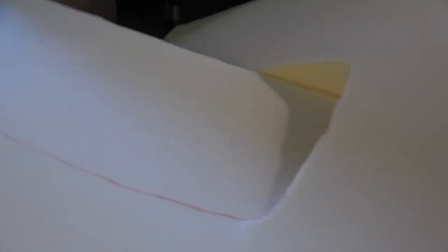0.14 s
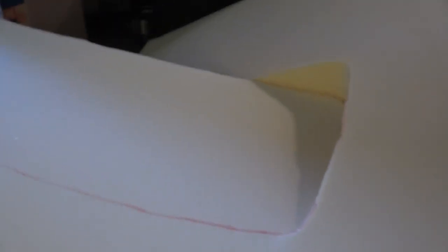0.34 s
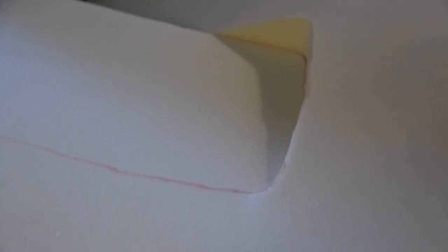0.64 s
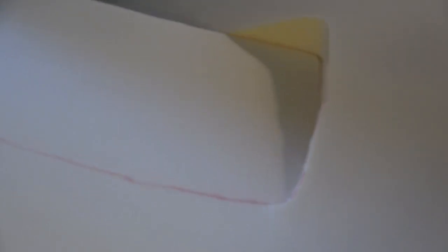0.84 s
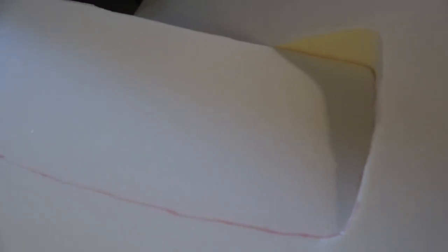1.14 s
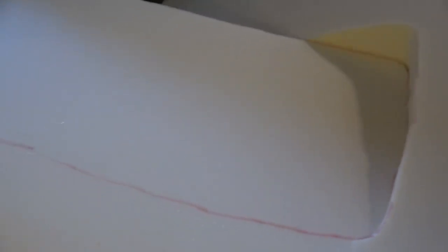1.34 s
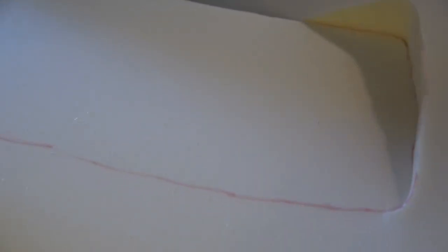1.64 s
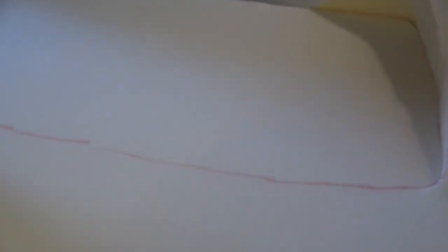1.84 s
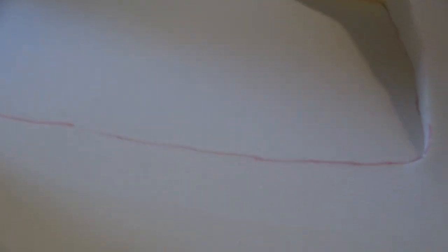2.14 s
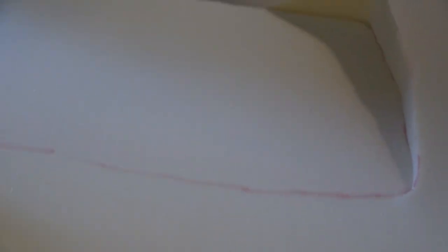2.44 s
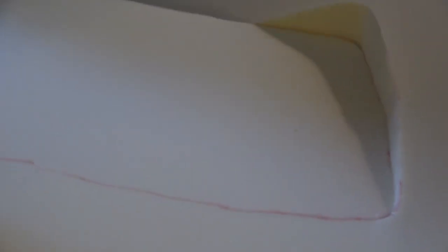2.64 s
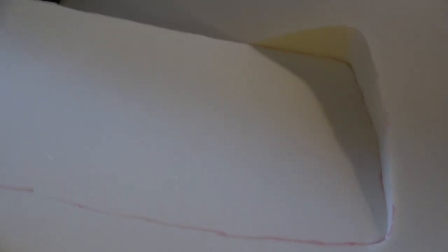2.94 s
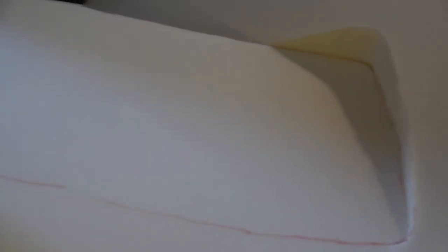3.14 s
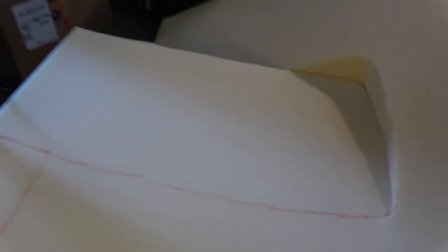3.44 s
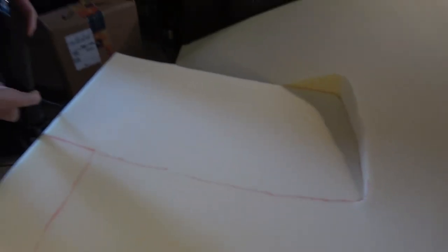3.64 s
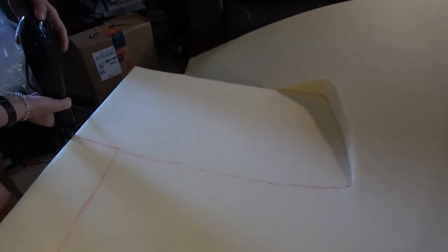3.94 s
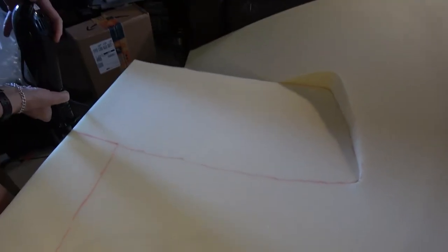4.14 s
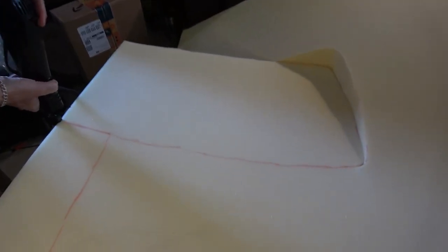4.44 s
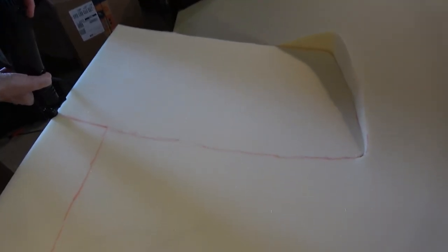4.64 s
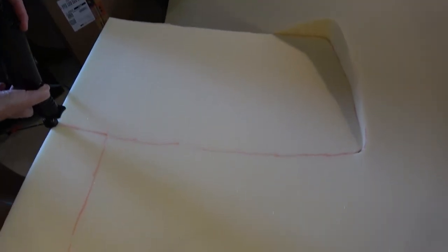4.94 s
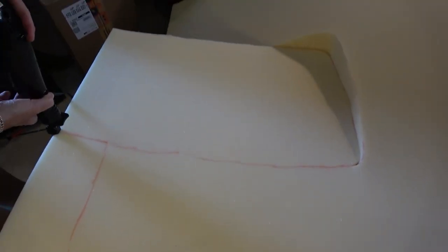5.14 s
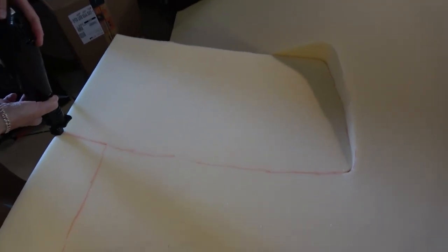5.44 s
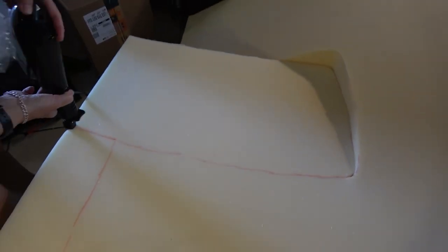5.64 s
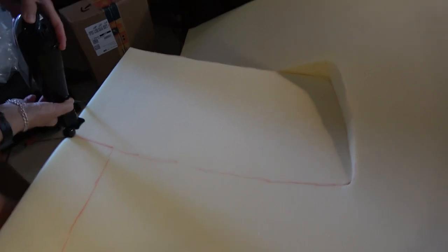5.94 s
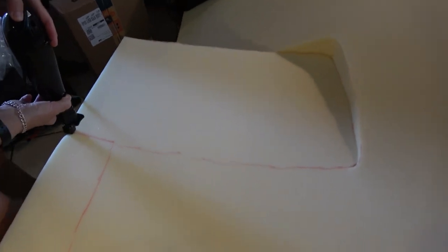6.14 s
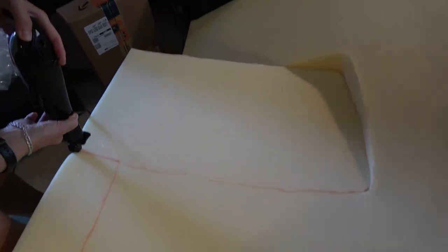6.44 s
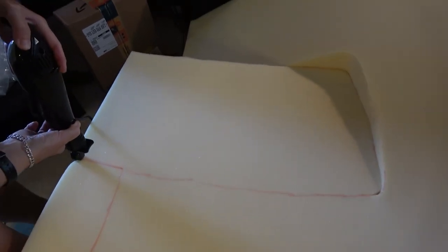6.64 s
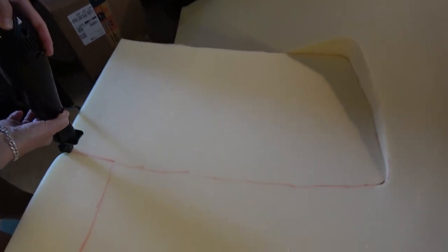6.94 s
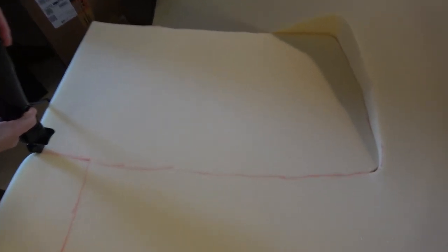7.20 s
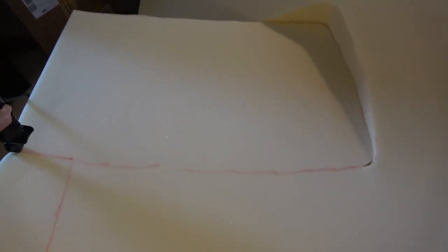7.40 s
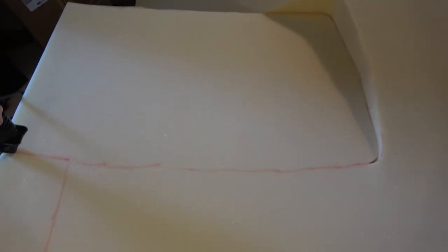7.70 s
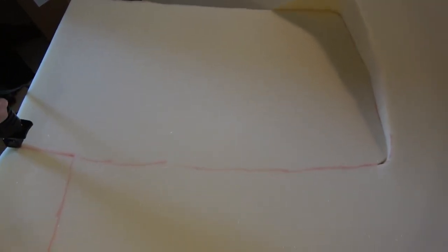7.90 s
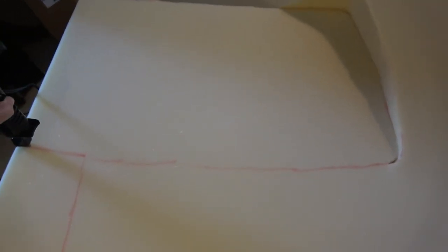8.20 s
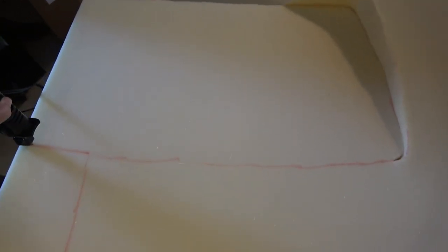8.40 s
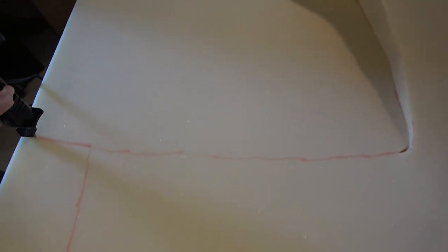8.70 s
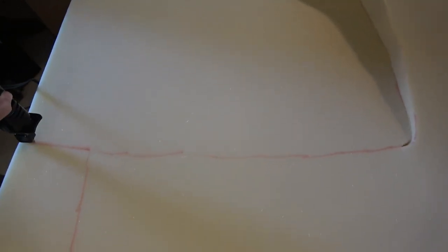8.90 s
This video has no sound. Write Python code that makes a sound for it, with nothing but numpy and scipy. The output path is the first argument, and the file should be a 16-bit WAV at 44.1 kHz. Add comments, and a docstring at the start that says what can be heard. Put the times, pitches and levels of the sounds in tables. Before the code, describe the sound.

A quiet, dry indoor space with low room tone. A hand-held electric knife taps and brushes lightly against a foam mattress, pauses, then its switch snaps and the motor surges up in a fraction of a second. Reciprocating blades chatter about thirty times a second, with hum, whine, gear rattle and bright steel squeaks. The sawing continues to the end, heard close and left of centre.

```python
"""In a small, dead room an electric carving knife is set against a foam mattress with a few clicks and
rustles, then spins up and saws on. One crank angle, some 30 to 36 strokes a second once up to speed, drives
every part: the handle hums at its multiples, the motor whines, gear contacts ring a housing as growl and rattle.
At fixed places of each stroke the blades knock, squeak and rasp by stick-slip, over a gritty sliding hiss."""
import sys
import numpy as np
from scipy import signal
from scipy.fft import rfft, irfft, next_fast_len
from scipy.io import wavfile
from scipy.ndimage import uniform_filter1d, map_coordinates

SR = 44100
rng = np.random.default_rng(int(sys.argv[2]) if len(sys.argv) > 2 else 0)


def bounce(signal):
    """Save signal as a 16-bit WAV file at the path given by the first command-line argument."""
    frames = np.transpose(np.atleast_2d(signal))
    limited = np.clip(frames, -1, 1)
    pcm = np.round(limited * 32767).astype(np.int16)
    wavfile.write(sys.argv[1], SR, pcm)


N = 399546
TIME = np.arange(N) / SR

# relative spectrum of a light, hard contact: frequency_hz, density_db (per Hz)
CONTACT_SPECTRUM = [(80, 6), (500, 6.5), (2000, -0.5), (4000, -1), (7000, 2), (10500, 2.5), (13500, -6),
                    (16000, -14)]


def amp(db):
    """Level law: decibels to amplitude gain."""
    return np.exp(np.asarray(db) * (np.log(10) / 20))


def unit(x):
    """Normalisation to an rms of 1."""
    return x / np.sqrt(np.mean(x ** 2) + 1e-20)


def along(points, hz):
    """Linear interpolation of (frequency_hz, value) points on a log frequency axis."""
    f, v = np.transpose(points)
    return np.interp(np.log(hz + 1), np.log(f + 1), v)


def curve(points):
    """Linear interpolation of (time_s, value) points, one value per sample."""
    s, v = np.transpose(points)
    return np.interp(TIME, s, v)


def bell(x, centre, width):
    """Gaussian hump of height 1, down to 1/e at one width from its centre."""
    return np.exp(-((x - centre) / width) ** 2)


def wobble(rate, size=N):
    """Band-limited random curve: a spline through normal random knots, rate of them a second."""
    knots = rng.standard_normal(int(size * rate / SR) + 4)
    t = TIME[:size]
    coarse = t[::12]
    return np.interp(t, coarse, map_coordinates(knots, [coarse * rate]))


def noise():
    """White noise: equal power at every frequency."""
    return rng.standard_normal(N)


def filtered(x, response):
    """Linear filtering: the spectrum of x times a response of frequency."""
    m = next_fast_len(x.shape[-1] + 8192)
    return irfft(rfft(x, m) * response(np.fft.rfftfreq(m, 1 / SR)), m)[..., :x.shape[-1]]


def coloured(x, spectrum):
    """Spectral shaping by (frequency_hz, db) points, brought to rms 1."""
    return unit(filtered(x, lambda hz: amp(along(spectrum, hz))))


def resonant(x, modes):
    """Modal superposition: x rung through (mode_hz, width_hz, gain_db) resonances, at rms 1."""
    def response(f):
        return sum(amp(db) * 1j * f * width / (hz * hz - f * f + 1j * f * width) for hz, width, db in modes)

    return unit(filtered(x, response))


def window(turns, place, length):
    """Periodic gating by crank angle: a bell that opens once per stroke, down to 1/e at twice the length."""
    return np.exp(-((turns - place - np.rint(turns - place)) / length) ** 2 / 4)


def unseated():
    """Play in the drive: 1 until the blades seat, then 0."""
    seated_s = 3.3
    return np.clip((seated_s - TIME) / 0.068 + 0.5, 0, 1)


def level(rule, spin, bite):
    """Load dependence: a part's gain follows the spin-up, the bite and the closing of slack."""
    db, full_bite_db, slack_db, spin_power = rule
    snug_bite = 0.15  # bite over which the slack between the blades closes by a factor e
    return amp(db + full_bite_db * bite + slack_db * np.exp(-bite / snug_bite)) * spin ** spin_power


def background():
    """Diffuse room tone: steady coloured noise, mostly common to both sides and partly independent."""
    # spectrum of the quiet room: frequency_hz, density_db (per Hz, relative)
    floor_spectrum = [(15, -45), (25, -24), (96, -2), (178, -15.5), (215, -8), (274, -11.5), (457, -12.5),
                      (495, -17), (782, -11.5), (1200, -21.5), (1340, -22), (4000, -29.5), (15500, -41)]
    common = amp(-59.5) * coloured(noise(), floor_spectrum)
    separate = amp(-71.5) * coloured(rng.standard_normal((2, N)), floor_spectrum)
    return common + separate


def handling(tick_s, thud_s, tail_s):
    """Impact excitation: short contact forces on the handle give dull knocks, plastic clicks and rings; one
    brief ring near 2.3 kHz sounds as the motor spins up."""
    # contacts as the knife is handled, plus a brief ring near 2.3 kHz at 2.226 s as the motor spins up:
    # start_s, knock_db, tick_db, ring_db, ring_hz
    clicks = [(.092, -57, -47.5, -56, 3160), (.148, -47, -58, -56, 3000), (.169, -47, -40, -37, 7700),
              (.197, -53, -32.5, -36, 2140), (.283, -39, -49, -50, 2970), (.293, -43, -43, -28.5, 3050),
              (.304, -45, -52, -46.5, 3000), (.363, -50, -62, -58, 3000), (.475, -41.5, -51, -46, 8290),
              (.542, -57, -40, -44, 6900), (.563, -42, -38, -45, 3360), (.576, -35, -48, -51, 3760),
              (0.601, -28, -52, -46, 3120), (.62, -51, -45, -41, 4700), (0.688, -44, -49, -41, 2190),
              (2.162, -59, -42, -54, 2300), (2.226, -48, -44, -22, 2340), (2.265, -55, -31, -27, 6200)]
    # relative spectrum of a dull knock: frequency_hz, density_db (per Hz)
    thud_spectrum = [(80, -33), (300, -2), (750, 14), (1150, 1), (1800, -6), (3000, -35), (8000, -45)]
    thuds, ticks, rings = np.zeros((3, N))
    for s, knock_db, tick_db, ring_db, ring_hz in clicks:
        near = (TIME > s) & (TIME < s + 0.1)
        age = TIME[near] - s

        def strike(rise):
            """Contact force that builds to its peak, lets go and leaves a faint tail."""
            pulse = (age / rise) ** 4 * np.exp(4 * (1 - age / rise))
            return pulse + 0.18 * (age > rise) * np.exp(-age / tail_s)

        snap = strike(tick_s)
        thuds[near] += amp(knock_db) * strike(thud_s)
        ticks[near] += amp(tick_db) * snap
        rough_phase = 1.24 * wobble(1800)[near]
        rings[near] += amp(ring_db) * snap * np.sin(2 * np.pi * ring_hz * age + rough_phase)
    return thuds * coloured(noise(), thud_spectrum) + ticks * coloured(noise(), CONTACT_SPECTRUM) + rings


def brushing():
    """Friction excitation: each touch of the idle blade hisses, rings the steel and rustles the foam."""
    # steel brushes over the foam: start_s, rise_s, decay_s, hiss_db, blade_ring_db, foam_rustle_db
    brushes = [(.167, .005, .014, -43, -53, -60), (.195, .014, 0.028, -49.5, -56, -65),
               (.29, .02, 0.11, -62, -66, -70), (.435, .041, 0.048, -45.5, -54, -66),
               (.74, 0.036, 0.098, -59, -51.5, -61), (.92, 0.055, 0.082, -76, -68, -63),
               (1.22, .035, .035, -68, -70, -61), (1.28, 0.037, .045, -80, -84, -58),
               (1.745, .03, .07, -76, -63, -76), (1.855, .018, 0.064, -70, -64, -59),
               (1.96, 0.056, 0.1, -71, -64, -65)]
    # bending modes of the free blade: mode_hz, width_hz, gain_db
    blade_modes = [(6100, 400, 4), (7800, 700, -1), (9600, 450, -3), (11900, 400, -2), (14300, 600, -7)]
    # relative spectrum of the rustling foam: frequency_hz, density_db (per Hz)
    foam_spectrum = [(600, -20), (2000, -7), (3100, 1), (4300, -7), (6000, -6), (8000, -16), (16000, -35)]
    hiss = coloured(noise(), CONTACT_SPECTRUM)
    voices = np.array([hiss, resonant(noise(), blade_modes), coloured(noise(), foam_spectrum)])
    out = np.zeros(N)
    for s, rise, decay, *levels_db in brushes:
        attack = np.clip((TIME - s) / rise, 0, 1) ** 2
        touch = attack * np.exp(-np.maximum(TIME - s - rise, 0) / decay)
        out += touch * (amp(levels_db) @ voices)
    return out * amp(0.98 * wobble(120))


def bumping():
    """Soft impact: the handle bumps the yielding mattress, giving smooth bursts of low noise."""
    # bumps: centre_s, bell_width_s, level_db
    bumps = [(.175, .02, -54), (.39, .025, -56), (2.604, .025, -40)]
    # relative spectrum of a bump: frequency_hz, density_db (per Hz)
    bump_spectrum = [(40, -23.5), (130, -3), (240, -6), (330, -9), (700, -40)]
    force = sum(amp(db) * bell(TIME, s, width) for s, width, db in bumps)
    return force * coloured(noise(), bump_spectrum)


def handle(turns, spin, bite, waver_db):
    """Forced vibration: the blades' periodic motion shakes the handle at multiples of the stroke rate."""
    # one row per multiple from the first up: unseated_db, running_free_db, biting_db
    hum_levels = [(-63, -65, -59), (-53, -54.5, -51.5), (-57, -45, -58.5), (-51, -54, -60.5),
                  (-46.5, -50.5, -39), (-50, -64, -51), (-58, -65, -67), (-65, -68, -49), (-65, -58, -57),
                  (-51.5, -51.5, -51), (-50, -60, -46.5), (-58, -55, -58), (-68, -60, -45.5),
                  (-63, -52, -48), (-50.5, -51.5, -46.5), (-60, -54.5, -43.5)]
    # the handle rocks as the grip shifts: centre_s, bell_width_s, multiple, gain_db
    rocking = [(3.7, 0.35, 10, 9), (4.5, 0.73, 4, 14), (4.45, 0.63, 2, 7), (4.42, 0.2, 5, -6.5),
               (4.8, 0.3, 7, 17), (4.9, 0.84, 6, 12.5), (6.6, 0.48, 13, -15), (5.8, 0.54, 14, -14),
               (6.1, 0.45, 5, 2.5), (4, 0.19, 5, 6.5), (8.25, 0.32, 3, 12), (8.25, 0.29, 4, 10),
               (8.847, 0.23, 5, -6), (9, .2, 3, 7), (4.83, 0.21, 10, 4), (7.2, .25, 5, 2),
               (3.1, 0.19, 5, 2.5)]
    hum = np.zeros(N)
    loose = unseated()
    for order, (loose_db, free_db, biting_db) in enumerate(hum_levels, 1):
        # the foam braces the handle, and higher multiples need a deeper bite
        full_bite = 0.43 + 0.039 * order
        braced = np.minimum(bite / full_bite, 1)
        seated_db = free_db + braced * (biting_db - free_db)
        db = loose * loose_db + (1 - loose) * seated_db + waver_db * wobble(6.5)
        for s, width, multiple, gain_db in rocking:
            if multiple == order:
                db += gain_db * bell(TIME, s, width)
        phase = 2 * np.pi * (order * turns + rng.random()) + 0.26 * wobble(25)
        hum += amp(db) * np.sin(phase)
    return np.sqrt(2) * spin ** 3.5 * hum


def swell(hz, mode):
    """Resonant gain: the dB that a line gains as it crosses a mode."""
    mode_hz, half_width_hz, peak_db = mode
    return peak_db / (1 + ((hz - mode_hz) / half_width_hz) ** 2)


def motor(turns, speed, spin, flutter_db):
    """Electromagnetic excitation: armature lines follow the speed, with mains sidebands and a starting surge."""
    # motor whine: multiple (of the stroke rate), level_db (relative), phase_roughness_rad
    whine_lines = [(155, -14, 6.8), (248, -17, 4.6), (320, -17, 2.8)]
    # whine level, which sinks under heavy load: time_s, level_db
    whine_level = [(2.6, -36), (3.3, -34), (3.8, -33), (4.4, -33.3), (5.1, -33), (5.7, -39), (6.6, -44),
                   (8.1, -43), (8.3, -35), (8.55, -33), (8.75, -39), (9.06, -42)]
    # casing resonance: mode_hz, half_width_hz, peak_db
    casing_mode = (2230, 250, 11.3)
    # brush sparking while the motor accelerates: multiple (of the stroke rate), level_db, phase_roughness_rad
    commutator = (153.5, -40, 4.2)
    slot_order, slot_rough_rad, mains_ripple_hz = 80, 0.46, 120
    below_db, slot_db, above_db = -14.5, -6.5, -9  # lower sideband, slot tone, upper sideband

    def line(order, db, rough, offset_hz=0):
        """Phase-modulated partial, lifted where it crosses the casing resonance."""
        phase = 2 * np.pi * (order * turns + offset_hz * TIME) + rough * wobble(160) + wobble(8)
        return np.sqrt(2) * amp(db + swell(order * speed + offset_hz, casing_mode)) * np.sin(phase)

    slots = sum(line(slot_order, db, slot_rough_rad, side * mains_ripple_hz)
                for side, db in [(-1, below_db), (0, slot_db), (1, above_db)])
    whine = amp(wobble(9)) * slots + sum(line(*row) for row in whine_lines)
    # the starting current falls as the speed rises
    current = 1 - spin
    surge = current * spin ** 5.8
    sparking = current * spin ** 4.2
    strength = amp(curve(whine_level)) * spin ** 7.5 + amp(-29) * (surge / surge.max()) ** 2
    sparks = sparking / sparking.max() * amp(4 * wobble(70)) * line(*commutator)
    return amp(flutter_db * wobble(140)) * (strength * whine + sparks)


def teeth(turns, wear_rate, size=384):
    """Cyclic roughness: the gear's uneven surface nearly repeats each turn and changes slowly."""
    surface = rng.standard_normal((int(N / SR * wear_rate) + 3, size))
    position = [TIME * wear_rate, turns % 1 * size]
    return unit(map_coordinates(surface, position, order=2, mode="grid-wrap"))


def knocks(turns, speed, glide_s, scatter_db):
    """Dispersion: in thin steel the high bending waves arrive first, so each knock falls in pitch."""
    # blade knocks in each stroke: place (0-1), first_hz, last_hz, decay_60db_s, level_db (relative)
    knock_places = [(0.061, 2260, 1400, 0.0058, 4.5), (.36, 2660, 1830, 0.0061, 4.5),
                    (.59, 3700, 1100, .008, 5), (0.649, 1400, 440, 0.0091, -7.5)]
    out = np.zeros(N)
    for place, first_hz, last_hz, decay_s, db in knock_places:
        age = (turns - place) % 1 / speed
        cycles = last_hz * age + (first_hz - last_hz) * glide_s * (1 - np.exp(-age / glide_s))
        gain = amp(db + scatter_db * wobble(30) - 60 * age / decay_s)
        attack = 1 - np.exp(-age / 0.0016)
        out += gain * attack * np.sin(2 * np.pi * cycles)
    return unit(out)


def buzz(turns, size=2048):
    """Periodic forcing: a tooth force that repeats exactly on every turn rings the housing's modes."""
    # modes of the pressed gear housing: mode_hz, width_hz, gain_db
    housing_modes = [(1178, 26, 3), (1462, 33, 1), (1720, 80, -7), (1830, 25, -1), (2280, 30, -3),
                     (2480, 28, -8)]
    # equal harmonics in random phase
    profile = irfft(np.exp(2j * np.pi * rng.random(size // 16)), size)
    force = np.interp(turns % 1, np.arange(size) / size, profile)
    return resonant(force, housing_modes)


def gear_tones(turns):
    """Order tones: single multiples of the stroke rate swell out of the gears and fade."""
    # tones: centre_s, bell_width_s, multiple, level_db
    tones = [(5.05, 0.55, 24, -38.5), (5.8, 0.51, 30, -47), (6.15, 0.56, 39, -37.5), (7.3, 0.87, 39, -41.5),
             (7.05, 0.53, 55, -37.5), (7.05, 0.58, 57, -36.5), (7.4, .6, 42, -41), (8.85, 0.22, 39, -40)]
    out = np.zeros(N)
    for s, width, multiple, db in tones:
        phase = 2 * np.pi * multiple * turns + 0.3 * wobble(20)
        out += amp(db) * bell(TIME, s, width) * np.sin(phase)
    return np.sqrt(2) * out


def gears(turns, speed, spin, bite):
    """Contact excitation: free gears chatter at random, while firmer meshing repeats on every turn."""
    # how firmly the gears mesh: time_s, repeating_share (0-1)
    meshing = [(2.2, 0.26), (4.2, 0.34), (4.75, 0.52), (5, 0.52), (6.7, 0.8), (7.65, 0.45), (7.8, 0.3),
               (8.05, .75), (8.2, 0.32), (8.65, 0.32), (8.85, 0.57)]
    # relative spectra at three loads: frequency_hz, density_db (per Hz)
    growl_free = [(20, -60), (90, -10), (200, -15), (400, -12), (480, -8), (720, 2.5), (1000, 0),
                  (1250, -1), (1700, -16), (3000, -60)]
    growl_half = [(20, -60), (90, -18), (380, -17), (480, -3.5), (640, 0), (780, -1.5), (930, -1.5),
                  (1200, -0.5), (1500, -13.5), (3000, -60)]
    growl_full = [(20, -60), (90, -22), (360, -15), (430, -8.5), (530, -3), (630, 1), (760, -10.5),
                  (950, -10), (1700, -12), (3000, -60)]
    rattle_free = [(500, -34), (950, -35), (1180, -11), (1550, -2), (1950, -1), (2400, 0), (2800, -5),
                   (3400, -2.5), (4200, -2), (5500, -40), (9000, -50)]
    rattle_half = [(500, -47), (950, -22), (1180, -9), (1400, -3), (1600, -6.5), (1950, -1), (2400, 1),
                   (2800, 0), (3400, -4), (4200, -2.5), (5500, -6), (9000, -50)]
    rattle_full = [(500, -66), (1040, -16), (1180, 3.5), (1340, -5), (1470, 1), (1570, -6), (1700, -4),
                   (1950, -3), (2250, -2), (2800, -4.5), (3400, -3.5), (4200, -13), (5500, -23),
                   (9000, -50)]
    # gain rules: level_db, full_bite_db, slack_db, spin_power
    growl_rule = (-27.5, -9, -5.5, 1.8)
    rattle_rule = (-29.5, 0.14, -0.9, 1.85)
    knock_rule = (-45, 13, -2, 7)
    buzz_rule = (-57, 22.5, 0, 2)
    locked = curve(meshing)
    push = 1 + bite * (window(turns, 0.6, 0.055) + window(turns, 0.091, 0.033))
    half_bite = 0.75  # bite that counts as half load
    free = np.clip(1 - bite / half_bite, 0, 1)
    full = np.clip((bite - half_bite) / (1 - half_bite), 0, 1)
    load_weights = (free, 1 - free - full, full)

    def mesh(share, spectra):
        """Source and filter: tooth contacts ring the housing, whose resonances shift with load."""
        contacts = np.sqrt(share) * teeth(turns, wear_rate=1.296) + 2 * np.sqrt(1 - share) * noise()
        rung = sum(weight * coloured(contacts, spectrum) for weight, spectrum in zip(load_weights, spectra))
        return amp(0.91 * wobble(5)) * push * unit(rung)

    growl = level(growl_rule, spin, bite) * mesh(locked, (growl_free, growl_half, growl_full))
    # the rattle repeats less than the growl, and is 2 dB louder until the blades seat
    rattle = mesh(0.8 * locked, (rattle_free, rattle_half, rattle_full))
    rattle *= level(rattle_rule, spin, bite) * amp(2 * unseated())
    knocking = level(knock_rule, spin, bite) * knocks(turns, speed, glide_s=0.001754, scatter_db=2.5)
    buzzing = locked * level(buzz_rule, spin, bite) * buzz(turns)
    return growl + rattle + knocking + buzzing + gear_tones(turns)


def squeak(ring_hz, jump_hz):
    """Stick-slip oscillation: an uneven tone with its octave, its pitch jumping among nearby steel modes."""
    size = len(ring_hz)
    phase = 2 * np.pi * np.cumsum(ring_hz + jump_hz * 0.42 * wobble(1900, size)) / SR
    return np.sqrt(2) * (np.sin(phase) + amp(-12) * np.sin(2 * phase))


def blades(turns, spin, bite, fade_s, scatter_db):
    """Dry friction: sliding blades hiss, and tight spots that come and go as they bend squeak and rasp."""
    # tight spots: start_s, end_s, place (0-1 of a stroke), length (bell scale, strokes),
    # ring_hz, pitch_spread_hz (scale), rise_hz (per length), level_db (relative)
    scrapes = [(2.34, 2.52, .27, .11, 4270, 600, 34, 10), (2.1, 3.323, 0.31, .025, 6210, 1194, 150, 11.5),
               (2.47, 3.294, 0.29, 0.028, 5070, 500, 52.5, 12),
               (2.54, 3.32, .34, .02, 7700, 1100, 100.5, 6), (2.55, 3.3, .16, 0.042, 5000, 380, 52, 8.5),
               (2.68, 2.805, 0.7, .035, 4830, 400, 50, 15), (2.75, 3.28, 0.75, 0.038, 5620, 800, 98, 7),
               (3.45, 3.72, .4, 0.045, 5800, 1100, 46, 9.5),
               (3.83, 3.97, 0.28, 0.034, 6020, 700, 100, 12.5), (3.95, 4.8, 0.74, 0.069, 4570, 710, 30, 7),
               (4.15, 4.955, 0.32, 0.034, 6100, 843, 52, 7.5),
               (4.25, 5.95, 0.16, 0.048, 4830, 693, 100, 7.5), (4.4, 4.868, 0.81, .04, 6070, 800, 50, 9),
               (4.45, 5.6, 0.31, .03, 4920, 600, 48, 8), (4.9, 5.549, 0.3, 0.033, 7350, 700, 150, 10),
               (4.85, 6, 0.74, .034, 5140, 400, 50, 12.5), (4.95, 5.57, 0.62, 0.023, 4800, 500, 48, 13),
               (5.57, 6.02, 0.59, .027, 4936, 446, 2, 18), (5.55, 6.07, .53, .014, 7000, 602, 50, 10.5),
               (5.8, 8.21, 0.34, 0.023, 7500, 540, 94, 11), (6, 6.71, .75, .022, 5900, 910, 100, 8),
               (6.02, 8.2, 0.67, 0.028, 5130, 599, 27, 7.5), (6.07, 6.598, 0.56, 0.022, 6970, 450, -3, 15),
               (6.6, 7.65, .55, 0.028, 7300, 550, 2, 8.5), (6.72, 7.552, 0.68, 0.028, 5450, 496, 5, 3.5),
               (6.72, 7.6, 0.8, 0.026, 6930, 660, 83, 13.5), (7.6, 8.143, 0.73, 0.022, 5080, 906, 0, 6),
               (7.6, 8.136, 0.77, 0.02, 6600, 650, 100, 13.5),
               (8.23, 9.2, 0.33, 0.034, 7170, 520, 200, 13.5),
               (8.27, 8.724, 0.79, 0.021, 6200, 600, 250, 13), (8.27, 8.7, 0.69, .03, 5370, 398, 28, 10.5),
               (8.27, 8.72, 0.19, .06, 5280, 400, 30, 3), (8.65, 9.2, .55, .025, 7200, 490, 50, 8),
               (8.7, 9.2, 0.71, 0.047, 5310, 836, 301, 11)]
    # relative spectra: frequency_hz, density_db (per Hz)
    steel_spectrum = [(2500, -14), (4000, -5.5), (4700, 8), (5300, 3.5), (6000, 4.5), (7300, 4),
                      (8200, -13), (10000, -28)]
    hiss_spectrum = [(5000, -16), (8000, 2.5), (9700, 2), (11000, -2), (12500, -5), (14200, -11),
                     (15300, -7.5), (16000, -13)]
    rasp_spectrum = [(1200, -22), (2400, -5.5), (3600, -7), (4800, 3), (6500, 0), (8000, -9),
                     (10500, -10.5), (14000, -23)]
    # the steel rings on between squeaks: mode_hz, width_hz, gain_db
    steel_modes = [(4800, 200, 0), (5150, 230, -1)]
    # relative level of that ring: time_s, level_db
    ringing_level = [(2.4, -14), (2.7, -2), (3.25, -3), (3.4, -18), (4.3, -7), (5, -2), (6.05, -1),
                     (6.7, -7), (9.06, -8)]
    # gain rules: level_db, full_bite_db, slack_db, spin_power
    scrape_rule = (-22, 0, -13.5, 1.5)
    hiss_rule = (-32, -1, -11, 1)
    stroke_scatter_db, place_scatter = 1.5, 0.008  # no two strokes rub alike: dB, strokes
    squeaks, friction = np.zeros((2, N))
    for start, end, place, length, ring_hz, spread_hz, rise_hz, db in scrapes:
        near = (TIME > start - fade_s) & (TIME < end + fade_s)
        t, turn = TIME[near], turns[near]
        size = len(t)
        touch = np.clip(np.minimum(t - start, end - t) / fade_s + 0.5, 0, 1)
        offset = turn - place - np.rint(turn - place)
        glide = rise_hz * np.clip(offset / length, -2, 2)
        scatter = scatter_db * wobble(500, size) + stroke_scatter_db * wobble(29.95, size)
        force = amp(db + scatter) * touch
        force *= window(turn + place_scatter * wobble(30.1, size), place, length)
        squeaks[near] += force * squeak(ring_hz + glide, spread_hz)
        friction[near] += force ** 2
    rasp = amp(-5.5 + 1.3 * wobble(1100)) * np.sqrt(friction) * coloured(noise(), rasp_spectrum)
    ringing = amp(curve(ringing_level)) * resonant(noise(), steel_modes)
    # the squeaks' overtones fade out above 11 kHz
    dulled_squeaks = filtered(squeaks, lambda hz: 1 / (1 + (hz / 11000) ** 10))
    rub = amp(1.5) * coloured(noise(), steel_spectrum) + ringing + rasp + dulled_squeaks
    # the tight spots share one pressing force between them
    power = uniform_filter1d(uniform_filter1d(rub ** 2, size=5700), size=4300)
    scraping = level(scrape_rule, spin, bite) * rub / np.sqrt(np.abs(power))
    # serrations catch and let go, which makes the hiss gritty
    slide = 1 + 0.85 * (window(turns, 0.25, 0.048) + window(turns, 0.66, 0.033))
    grit = amp(1.2 * wobble(700) + 0.38 * wobble(25))
    hiss = level(hiss_rule, spin, bite) * unit(slide * grit * coloured(noise(), hiss_spectrum))
    breakaway_db = 11 * bell(TIME, 2.197, 0.014)  # the blades tear loose on their first stroke
    ease_db = -2.5 * bell(TIME, 8.22, 0.1)  # the hand lets up for a moment
    return amp(breakaway_db + ease_db + wobble(5)) * (scraping + hiss)


def knife():
    """Kinematic coupling: one crank angle and one depth of bite drive every part."""
    # crank speed once spun up, sagging as the foam loads the blades: time_s, strokes_per_s
    full_speed = [(2.16, 32.46), (3.25, 32.35), (3.5, 34.84), (3.75, 36.01), (4.5, 33.91), (4.85, 32.29),
                  (5.4, 31.21), (5.8, 31.04), (6.2, 30.66), (7.0, 30.24), (8.0, 30.39), (8.1, 30.5),
                  (8.4, 31.55), (8.6, 31.55), (8.75, 31.19), (9.06, 30.8)]
    # how deep the blades bite: time_s, bite (0-1)
    bite_depth = [(2.16, 0.02), (2.4, 0.1), (2.7, 0.43), (3.26, 0.23), (3.37, 0.07), (3.8, 0.05),
                  (4.4, 0.18), (4.85, 0.28), (5.5, 0.51), (6.03, 0.53), (6.8, 0.97), (8.05, 1),
                  (8.35, 0.83), (9.06, 0.97)]
    # the trigger closes, the crank jolts to a share of its speed and gains the rest exponentially
    trigger_s, start_jolt, spin_up_s = 2.16, 0.103, 0.138
    running = TIME > trigger_s
    spin = running * (1 - (1 - start_jolt) * np.exp(-np.abs(TIME - trigger_s) / spin_up_s))
    speed = np.maximum(spin, start_jolt) * curve(full_speed)
    turns = np.cumsum(speed * running) / SR
    bite = curve(bite_depth)
    # the knife is drawn back a little, which unloads the drive and calms the gears
    relief_db = -2.5 * bell(TIME, 8.47, 0.28)
    drive = handle(turns, spin, bite, waver_db=1.76)
    drive += motor(turns, speed, spin, flutter_db=2.5)
    drive += amp(relief_db) * gears(turns, speed, spin, bite)
    return drive + blades(turns, spin, bite, fade_s=0.056, scatter_db=1.55)


def placed(source):
    """Interaural cues: level and phase differences between two ports, plus a slow drift to the left."""
    # level difference: frequency_hz, left_minus_right_db
    balance = [(60, 2), (110, 2.5), (200, 3.5), (380, 8), (700, 9), (1290, 6.5), (2380, 5), (4400, 2.5),
               (8120, 7), (15000, 0)]
    # the knife moves left: time_s, added_left_minus_right_db
    drift = [(.7, -5), (2.2, -2.5), (4.7, -0.64), (6, -1.5), (7.5, 0.5)]
    # phase lead of the left port: frequency_hz, lead_rad
    lead = [(0, 0), (7240, -0.017), (9730, -0.43), (16600, 0.047)]
    sides = np.array([[0.5], [-0.5]])

    def ports(hz):
        """Complex gain of each port, with a mean magnitude of 1 over the pair."""
        gains = amp(sides * along(balance, hz))
        return gains / np.mean(gains, axis=0) * np.exp(1j * sides * along(lead, hz))

    return filtered(source, ports) * amp(sides * curve(drift))


def room(x, t60):
    """Diffuse reverberation: an independent, exponentially decaying noise tail on each side."""
    t = TIME[:SR // 4]
    tail = rng.standard_normal((2, len(t))) * amp(-60 * t / t60) * (t > 0.003)
    return signal.fftconvolve(x[None], tail / np.linalg.norm(tail[0]), axes=1)[:, :N]


def scene():
    """Superposition: direct sound, reverberation and room tone add."""
    source = handling(tick_s=0.0016, thud_s=0.003, tail_s=0.014) + brushing() + bumping() + knife()
    return placed(source) + amp(-20) * room(source, t60=0.22) + background()


def record(dry):
    """Band limiting: nothing is kept from 15.9 kHz up."""
    return filtered(dry, lambda hz: hz < 15900)


dry = scene()
out = record(dry)
bounce(out)
```